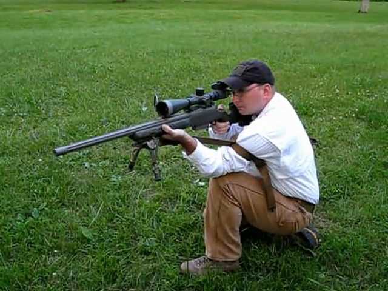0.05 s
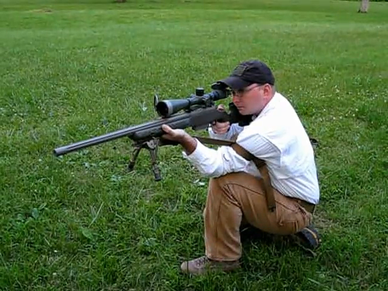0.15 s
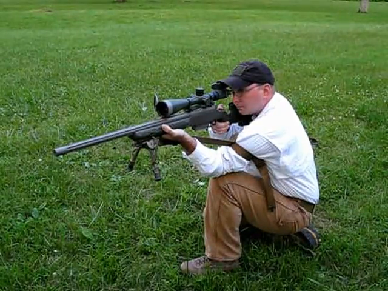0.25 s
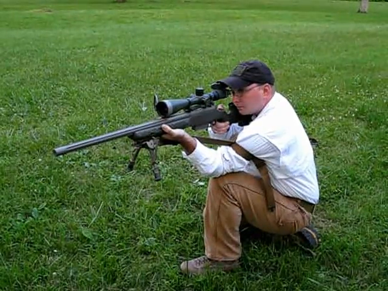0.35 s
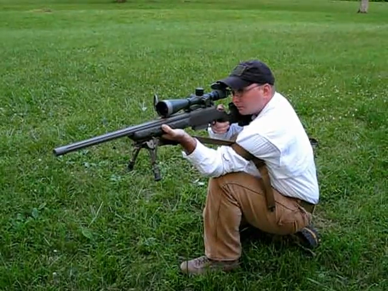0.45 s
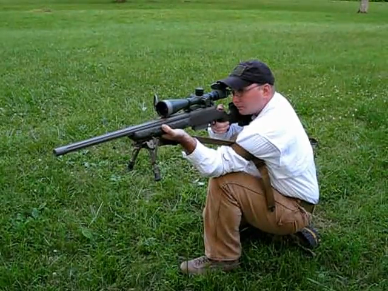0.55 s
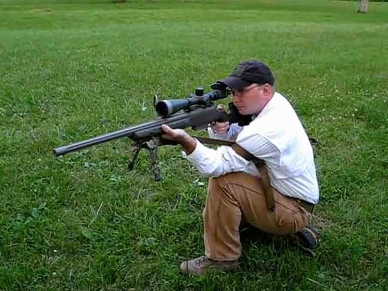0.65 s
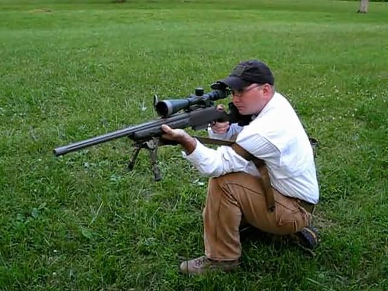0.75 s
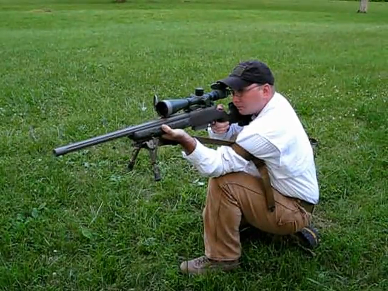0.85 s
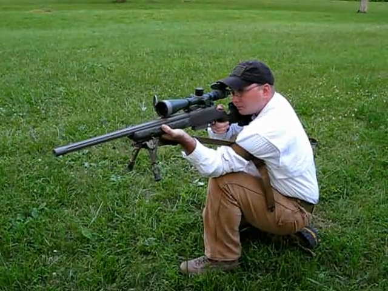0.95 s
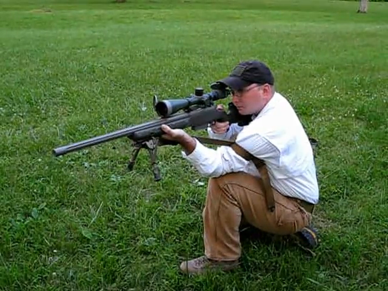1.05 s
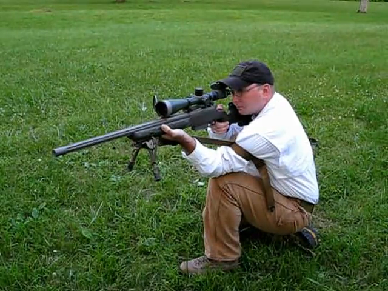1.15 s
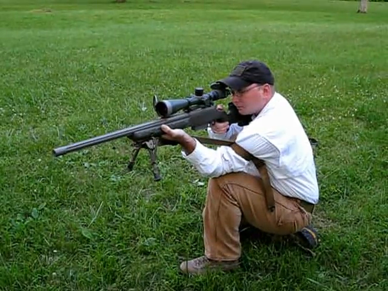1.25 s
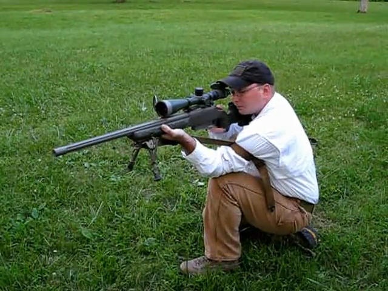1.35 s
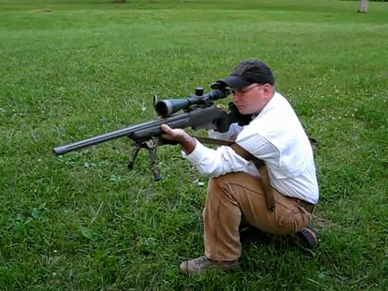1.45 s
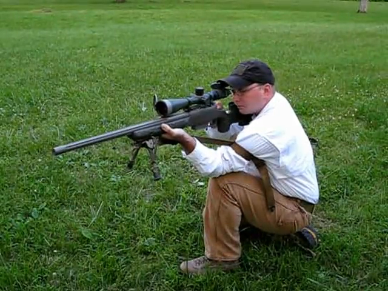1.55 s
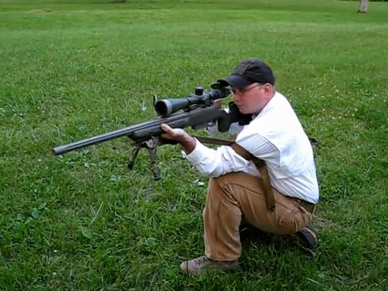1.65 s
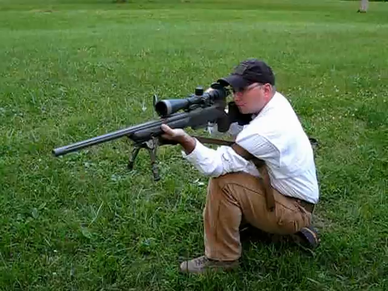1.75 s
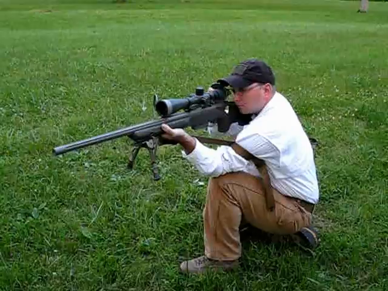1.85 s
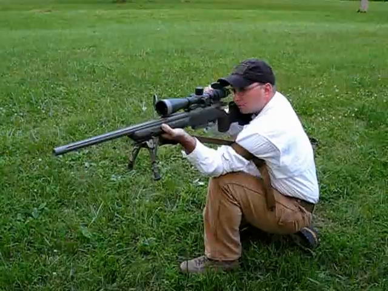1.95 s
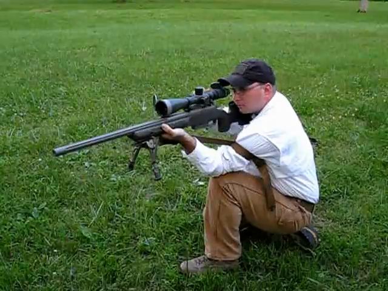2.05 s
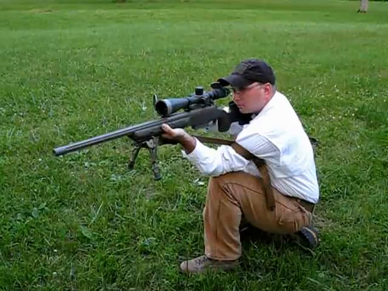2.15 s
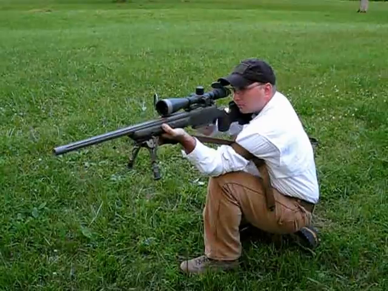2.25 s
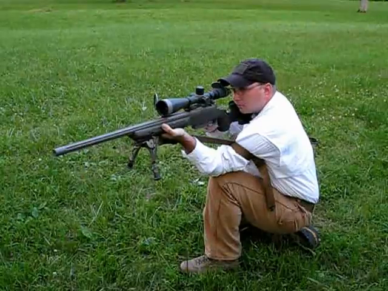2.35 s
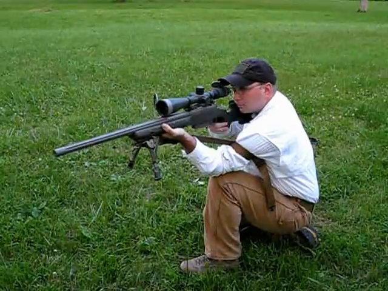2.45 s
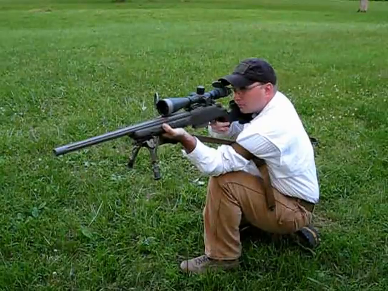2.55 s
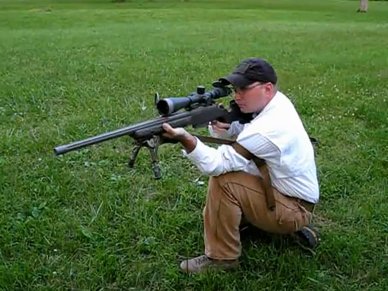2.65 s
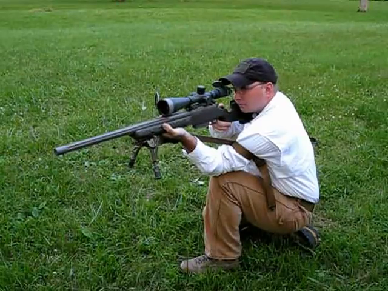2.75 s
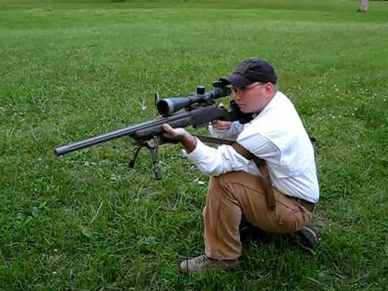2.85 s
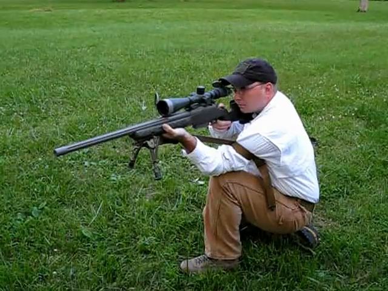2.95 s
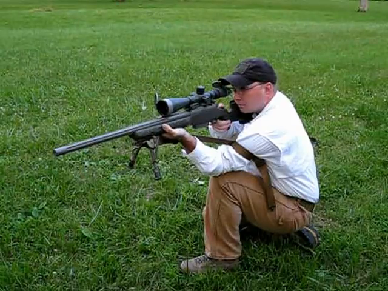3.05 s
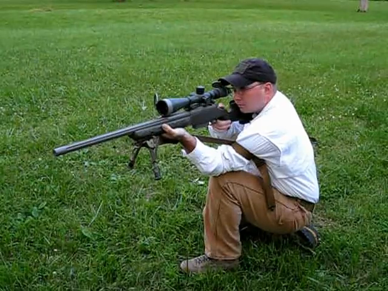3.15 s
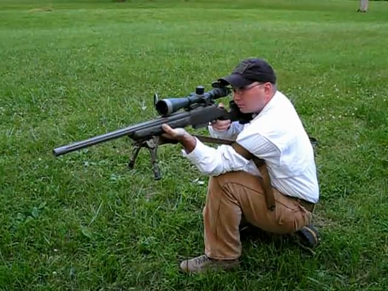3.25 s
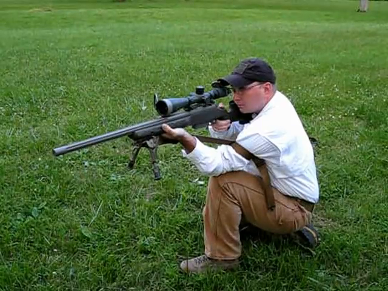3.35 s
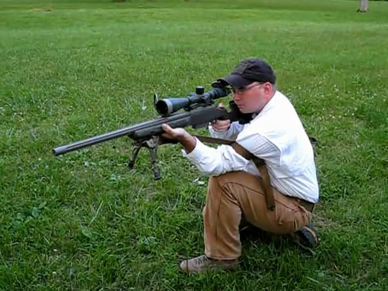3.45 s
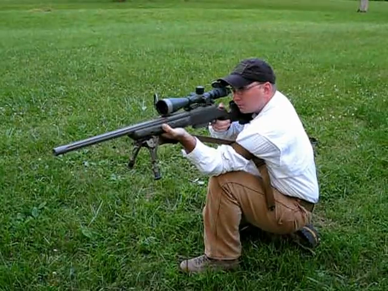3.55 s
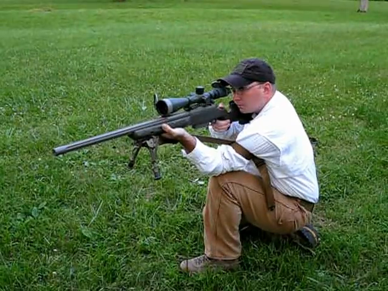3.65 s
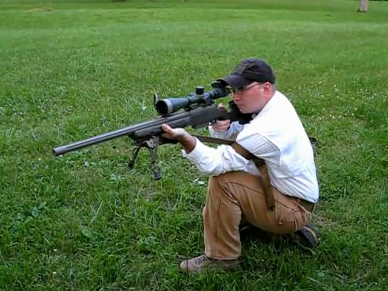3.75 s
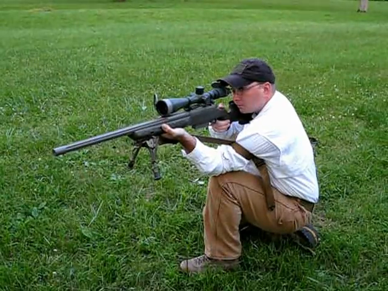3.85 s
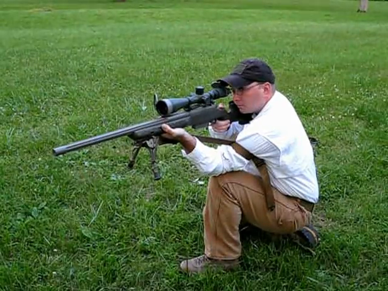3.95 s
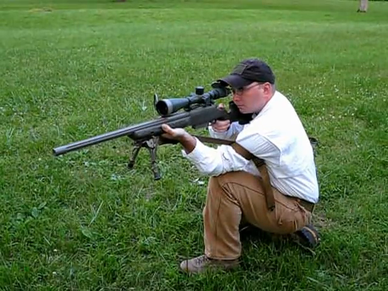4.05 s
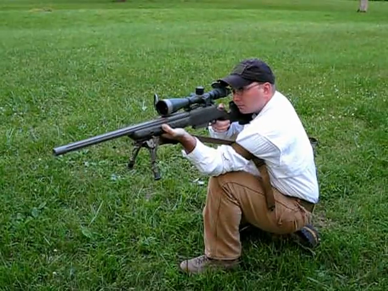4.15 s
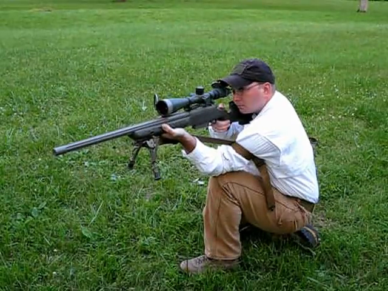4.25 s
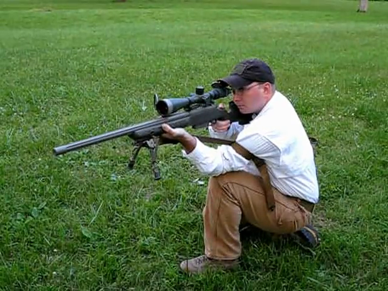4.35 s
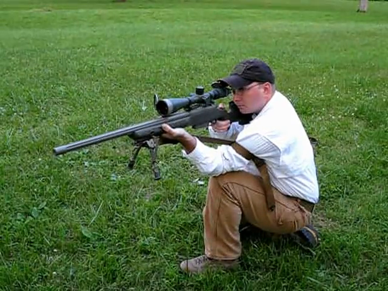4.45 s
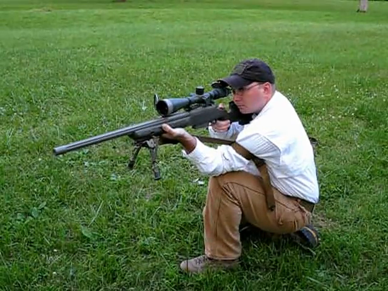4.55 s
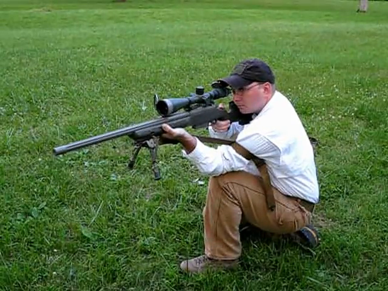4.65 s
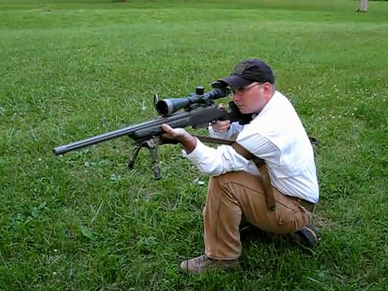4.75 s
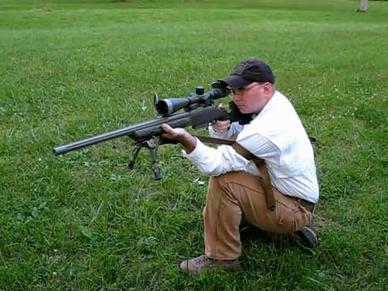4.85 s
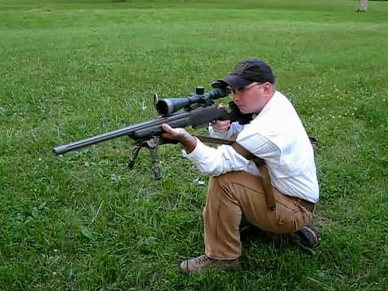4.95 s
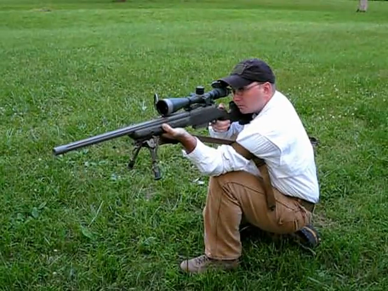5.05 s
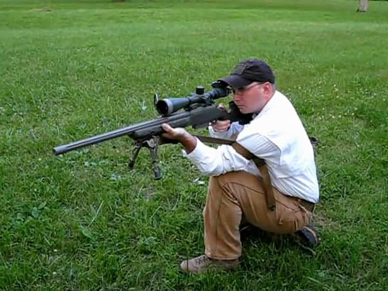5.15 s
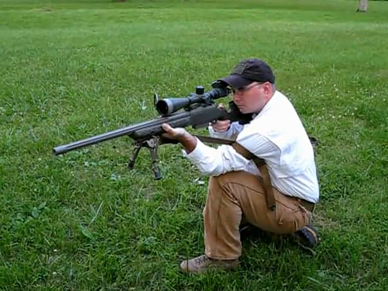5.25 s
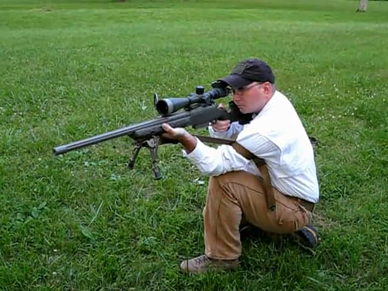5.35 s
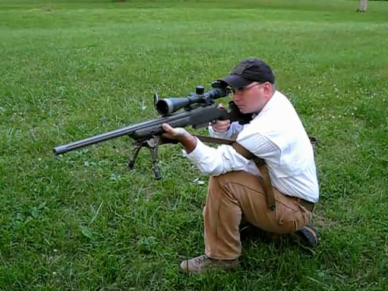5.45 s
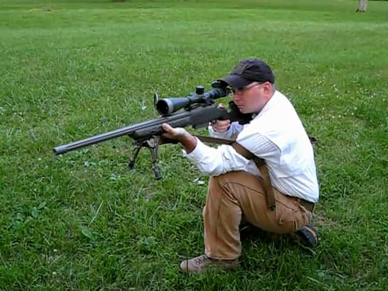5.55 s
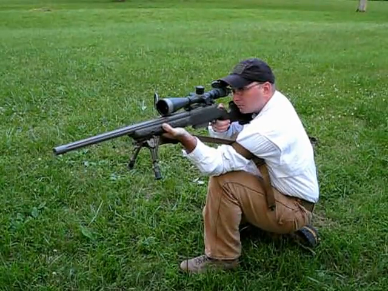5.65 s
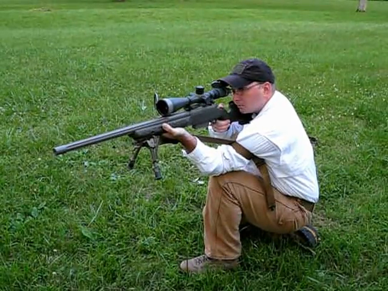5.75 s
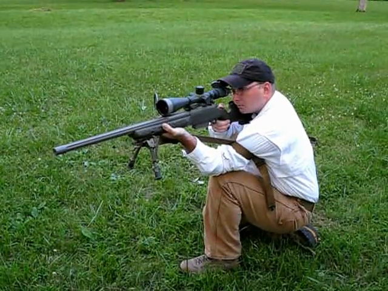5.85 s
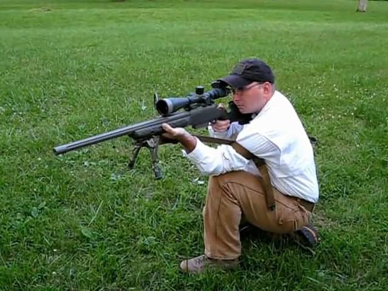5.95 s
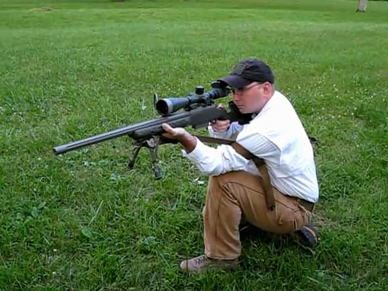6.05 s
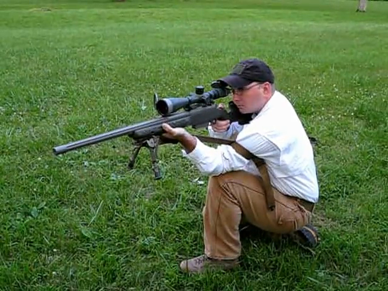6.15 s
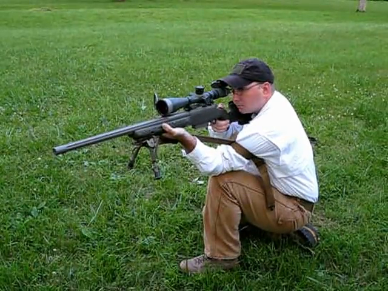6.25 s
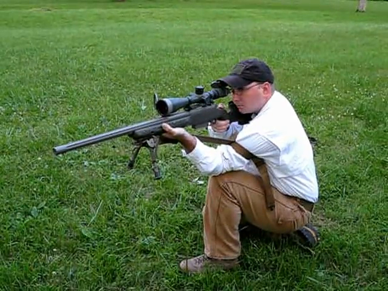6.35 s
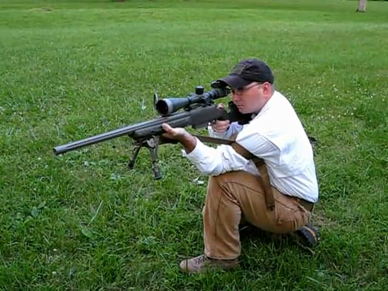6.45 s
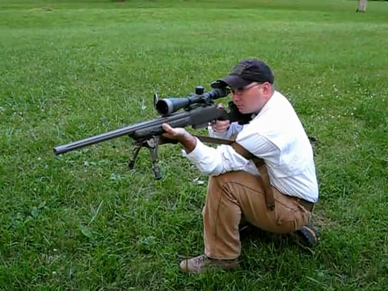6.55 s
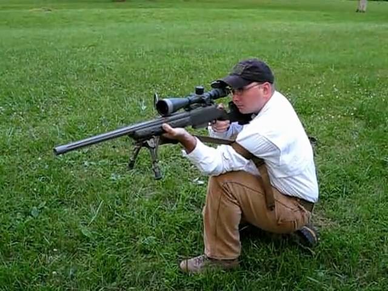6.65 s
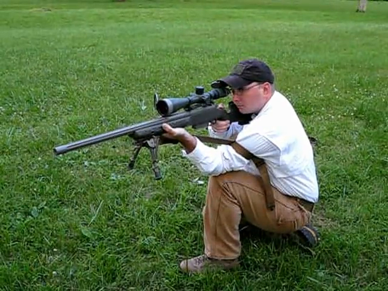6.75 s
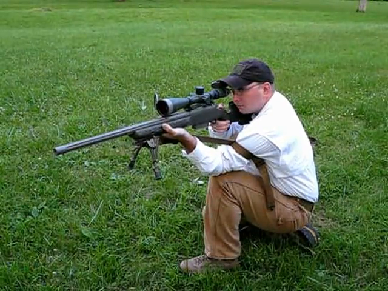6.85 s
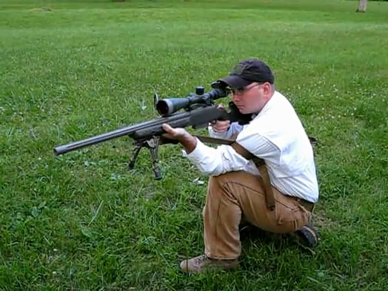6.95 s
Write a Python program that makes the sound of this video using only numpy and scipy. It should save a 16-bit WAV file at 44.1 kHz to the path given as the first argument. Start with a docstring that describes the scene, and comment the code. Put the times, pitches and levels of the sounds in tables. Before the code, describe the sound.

A soft, steady wash of distant traffic fills an open lawn for the whole seven seconds or so, with short, slurred bird chirps and a few thin, buzzy calls far off in the trees. At about 1.0 seconds, close to the microphone, an unloaded rifle is dry-fired: one sharp steel snap, the loudest sound. The bolt handle lifts with a click at 1.6 seconds, and the bolt slides back to its stop at 1.9. It is pushed home at 2.1 and locks with a firm click at 2.3. Each click rings briefly and leaves a light, scattered echo from the trees. After that only the background remains. The birds keep chirping, and a faint, low engine drone within the traffic slowly gathers speed, is nearest around 3.9 seconds and eases off at about 5.5.

```python
"""A wash of distant traffic comes first, with birds singing far off and one engine slowly gathering speed.
On a lawn, close to the microphone, an unloaded rifle is dry-fired; then its bolt is lifted, drawn back,
pushed home and locked, each click steel ringing against steel. The trees around scatter the clicks back,
and the camera's limiter ducks briefly after the loudest ones."""
import sys
import numpy as np
from scipy import signal
from scipy.fft import rfft, irfft, next_fast_len
from scipy.io import wavfile
from scipy.ndimage import uniform_filter1d, minimum_filter1d

SR = 44100
rng = np.random.default_rng(int(sys.argv[2]) if len(sys.argv) > 2 else 0)


def put_to_file(sound):
    """Save the sound as 16-bit audio at rate SR, in the file named by the first command-line argument."""
    columns = np.atleast_2d(sound).T  # one column per channel
    safe = np.clip(columns, -1, 1)
    whole_steps = np.round(safe * 32767)
    wavfile.write(sys.argv[1], SR, whole_steps.astype(np.int16))


N = 308259
TIME = np.arange(N) / SR


def amp(db):
    """Decibels to gain."""
    return 10 ** (np.asarray(db) / 20)


def unit_rms(x):
    """Scales to rms 1."""
    return x / np.sqrt(np.mean(x ** 2) + 1e-20)


def curve_db(points, hz):
    """Reads a spectrum on a log-frequency axis."""
    point_hz, db = np.transpose(points)
    return np.interp(np.log(hz + 1), np.log(point_hz + 1), db)


def add(mix, start_s, sound):
    """Mixes a sound in at its start time."""
    part = mix[max(round(start_s * SR), 0):][:len(sound)]
    part += sound[:len(part)]


def wander(rate_hz):
    """Slow random motion of rms 1."""
    size = next_fast_len(N, True)
    hz = np.fft.rfftfreq(size, 1 / SR)
    return unit_rms(irfft(rfft(rng.standard_normal(size)) * np.exp(-(hz / rate_hz) ** 2), size)[:N])


def resonance(hz, centre_hz, width_hz):
    """The shape of one resonance, 1 at its centre."""
    return 1 / (1 + (2 * (hz - centre_hz) / width_hz) ** 2)


def ringing(db):
    """The causal impulse response that has this gain curve."""
    log_gain = np.log(amp(np.r_[db, db[-2:0:-1]]))
    return np.fft.ifft(np.exp(np.conj(signal.hilbert(log_gain)))).real


def scatter(envelope_db, colour, air_loss_db=0):
    """A dense echo of energy 1; air_loss_db is the loss per second of travel at 10 kHz."""
    hz, t, bins = signal.stft(rng.standard_normal(len(envelope_db)), SR, nperseg=256)
    bins *= amp(curve_db(colour, hz)[:, None] - air_loss_db * t * (hz[:, None] / 10000) ** 2)
    tail = signal.istft(bins, SR, nperseg=256)[1][:len(envelope_db)] * amp(envelope_db)
    return tail / np.linalg.norm(tail)


# Far roads and rustling air, heard from the lawn. Each row: frequency in Hz, relative level in dB.
TRAFFIC_SPECTRUM = [(20, -30), (36, -47), (55, -22.5), (100, -8.5), (200, -6), (450, -8), (620, -6.5),
                    (900, -0.5), (1250, -3), (2000, -9.5), (4000, -16.5), (8000, -22.5), (12000, -26.5),
                    (16000, -33.5)]


def traffic(level_db=-44, nearest_s=1.58, fade_db_per_s=0.3168, patchy_db=0.5):
    """Tyre roar with drifting patches under a smooth hiss, loudest at its nearest moment."""
    hz, _, bins = signal.stft(rng.standard_normal(N), SR, nperseg=2048, noverlap=1536)
    patches = uniform_filter1d(rng.standard_normal(bins.shape), size=16, axis=0)
    patches = unit_rms(uniform_filter1d(patches, size=12, axis=1))
    bins *= amp(curve_db(TRAFFIC_SPECTRUM, hz)[:, None] + patchy_db * patches / (1 + hz[:, None] / 3000))
    wash = signal.istft(bins, SR, nperseg=2048, noverlap=1536)[1][:N]
    return amp(level_db - fade_db_per_s * abs(TIME - nearest_s)) * unit_rms(wash)


# One engine out in the traffic. Each row: multiple of the cycle rate, relative level in dB under load,
# the same with the throttle eased.
FIRING_ORDERS = [(3, -18, -5), (4, -5.5, -2), (5, -12, -5), (6, 0, -0.5), (7, -5, -13)]


def engine(level_db=-57, nearest_s=3.9, fade_db_per_s=2.5, ease_s=5.535, flutter_db=1.5,
           start_hz=14.65, climb_hz_per_s=0.82, top_hz=18.85, drop_hz=0.9):
    """Only low firing orders carry this far; as the throttle eases, they sag and order three booms."""
    eased = np.clip((TIME - ease_s) / 0.2, 0, 1)
    cycle_hz = np.minimum(start_hz + climb_hz_per_s * TIME, top_hz) - drop_hz * eased
    cycles = np.cumsum(cycle_hz) / SR
    drone = np.zeros(N)
    for order, loaded_db, eased_db in FIRING_ORDERS:
        order_db = loaded_db + (eased_db - loaded_db) * eased + flutter_db * wander(4.3)
        drone += amp(order_db) * np.sin(2 * np.pi * (round(order) * cycles + rng.random()))
    return np.sqrt(2) * amp(level_db - fade_db_per_s * abs(TIME - nearest_s)) * drone


def whistle(hz):
    """A soft-edged tone of rms 1 on this pitch curve."""
    return unit_rms(np.sin(2 * np.pi * np.cumsum(hz) / SR) * signal.windows.tukey(len(hz), 0.5))


# A songbird far off in the trees. Each row: start in seconds, note length in seconds, first and last
# pitch of the slur in Hz, level in dB before the trees, number of notes.
SONG_PHRASES = [ (0.353, .014, 5700, 7860, -51.5, 1), (0.749, 0.087, 3700, 2890, -48, 3),
                (1.368, 0.045, 3050, 2850, -45.5, 1), (1.42, .064, 2830, 2530, -46, 1),
                (1.906, .065, 3352, 2890, -42.5, 1), (1.992, 0.052, 2730, 2410, -47, 1),
                (2.578, .03, 2940, 3070, -50, 1), (2.632, .046, 3090, 2817, -46, 2),
                (2.72, .05, 3140, 3450, -55, 1), (3.152, .033, 3680, 2560, -47.5, 1),
                (3.535, 0.025, 2730, 2970, -48, 1), (3.539, 0.069, 2555, 2300, -47, 1),
                (3.591, 0.13, 2264, 2290, -55.5, 1), (3.661, 0.14, 3090, 3160, -53, 1),
                (3.71, 0.15, 2740, 2615, -54, 1), (4.151, .032, 2780, 3050, -51.5, 1),
                (4.197, 0.055, 3120, 2756, -47.5, 2), (4.709, .038, 3450, 2600, -47.5, 1),
                (5.076, 0.08, 2680, 2600, -54, 1), (5.166, .047, 3240, 2845, -45.5, 2),
                (5.733, 0.05, 2366, 2570, -46.5, 1), (5.836, 0.06149, 2253, 2520, -48.5, 1),
                (6.222, 0.099, 3310, 2477, -46.5, 1), (6.309, 0.061, 3100, 2810, -49.5, 1),
                (6.375, 0.057, 2600, 2270, -48, 1), (6.42, 0.1, 2220, 2177, -47, 1),
                (6.895, 0.029, 3400, 3530, -54.5, 1), (6.934, 0.062, 2580, 2480, -47.5, 1)]


def songbird(quaver_hz=35, step_ratio=0.82, step_db=-2, spacing=1.04):
    """Slurred whistles; each further note of a phrase is lower and softer."""
    song, quaver = np.zeros(N), quaver_hz * wander(205)
    for phrase_s, length_s, first_hz, last_hz, db, notes in SONG_PHRASES:
        remaining = np.linspace(1, 0, round(length_s * SR))
        slur_hz = last_hz + (first_hz - last_hz) * remaining ** 1.8  # starts fast, then settles
        unsteady = min(abs(first_hz - last_hz) / 200, 1.5)  # steep slurs are the least steady
        for note in range(round(notes)):
            start_s = phrase_s + note * spacing * length_s
            wobble_hz = unsteady * np.resize(quaver[round(start_s * SR):], len(slur_hz))
            pitch_hz = slur_hz * step_ratio ** note + wobble_hz
            add(song, start_s, amp(db + note * step_db) * whistle(pitch_hz))
    return song


# A second distant bird. Each row: start in seconds, level in dB before the trees.
BUZZ_CALLS = [(.14, -61), (.39, -63), (.61, -65), (.89, -65), (3.03, -60.5), (3.98, -68), (5.94, -68)]


def buzzing_bird(pitch_hz=7420, length_s=0.16, trill_hz=95, depth_hz=230, waver_hz=120):
    """A thin whistle, trilled so fast that it buzzes."""
    calls = np.zeros(N)
    hz = pitch_hz + depth_hz * np.sin(2 * np.pi * trill_hz * TIME) + waver_hz * wander(150)
    for start_s, db in BUZZ_CALLS:
        add(calls, start_s, amp(db) * whistle(hz[round(start_s * SR):][:round(length_s * SR)]))
    return calls


def through_woods(calls, direct_db=-2, scattered_db=-3, t60_s=0.7):
    """The trees smear the birdsong on its way to the microphone."""
    woods = scatter(-60 * np.arange(SR) / SR / t60_s, colour=[(1000, 0), (8000, 0)])
    return amp(direct_db) * calls + amp(scattered_db) * signal.oaconvolve(calls, woods)[:N]


# The colour of the echo from the trees around the lawn. Each row: frequency in Hz, relative gain in dB.
ECHO_COLOUR = [(100, -4), (1000, 2), (2800, -4), (3450, -1), (3950, 3), (4500, -2), (5250, 0.5), (5650, 4),
               (6500, 3), (9000, 5.5), (11000, 8), (15500, 4)]


def tree_echo(rings, echo_db=-22.5, sides=6, rise_s=0.023, hold_s=0.074, near_t60_s=0.38, far_t60_s=1.0):
    """Trunks and leaves return the clicks: near trees answer together, far ones leave a faint tail."""
    t = np.arange(SR) / SR
    onset = 1 - np.exp(-(t / rise_s) ** 2)
    near = amp(-60 * np.maximum(t - hold_s, 0) / near_t60_s)
    far = amp(-1.5 - 60 * t / far_t60_s)
    envelope_db = 20 * np.log10(onset * np.maximum(near, far) + 1e-9)
    echoes = (signal.fftconvolve(rifle(rings), scatter(envelope_db, ECHO_COLOUR, air_loss_db=36))[:N]
              for _ in range(sides))
    return amp(echo_db) / np.sqrt(sides) * sum(echoes)


# Resonances of the action and barrel, close up. Each row: centre in Hz, width in Hz, lift in dB.
STEEL_MODES = [(890, 180, 3.5), (1100, 220, 4), (1773, 170, 8), (2083, 78, 7.5), (2500, 290, 7),
               (2843, 250, 8.5), (3430, 420, 7.5), (4350, 150, 5), (4820, 190, 7.5), (5280, 200, 9),
               (5830, 180, 9), (7020, 410, 8), (8200, 140, 6.5), (9900, 350, -2), (10900, 900, 1.5),
               (12940, 340, 4), (13300, 360, -8)]
# The broad colour of a blow on steel. Each row: frequency in Hz, relative level in dB.
BLOW_COLOUR = [(30, -31), (100, -22), (450, -13.5), (900, -5), (1450, -3.5), (2500, -1.5), (3900, -1),
               (5600, -6), (9000, -8), (13000, -8.5), (16000, -8)]


def struck_part(blow_db, thud_db, knock_db, bright_db, part_hz, part_q=6, size=4096):
    """One impact's ring: steel resonances and the part's note, with its own thud, knock and brightness."""
    hz = np.fft.rfftfreq(size, 1 / SR)
    modes_db = sum(db * resonance(hz, centre, width) for centre, width, db in STEEL_MODES)
    contact_db = curve_db([(480, thud_db), (820, knock_db), (1500, 0), (4200, 0), (11000, bright_db)], hz)
    lift_db = 7.5 + 0.55 * max(blow_db, 0)  # hard blows bring out the part's own note
    part_db = lift_db * resonance(hz, part_hz, part_hz / part_q)
    return ringing(curve_db(BLOW_COLOUR, hz) + modes_db + contact_db + part_db)[:size // 4]


def chatter(decay_s, rise_s=0.0013, shake_db=-25, shake_t60_s=0.063, shake_hz=5000, size=4096):
    """The parts buzz against each other for a few ms, then the loose ones shake on, duller and fainter."""
    t = np.arange(size) / SR
    onset = 1 - np.exp(-(t / rise_s) ** 2)
    envelope = onset * amp(-60 * t / decay_s)
    contact, shake = rng.standard_normal((2, size))
    spectrum = rfft(envelope * contact)
    spectrum /= np.sqrt(abs(spectrum) + 1e-9)  # flatter: a hard contact excites all pitches alike
    buzz = irfft(spectrum) * amp(-20 * t / decay_s)
    buzz *= np.linalg.norm(envelope) / np.linalg.norm(buzz)
    shake = unit_rms(signal.lfilter([1], [1, -np.exp(-2 * np.pi * shake_hz / SR)], shake))
    return buzz + shake * onset * amp(shake_db - 60 * t / shake_t60_s)


def strike(db, ring, decay_s=0.015, halving_db=17.5):
    """One contact: its chatter, shorter the harder the blow, sets the ring going."""
    click = signal.fftconvolve(chatter(decay_s * 2 ** (-db / halving_db)), ring)
    peak_rms = np.sqrt(uniform_filter1d(click ** 2, size=88).max())  # the loudest 2 ms
    return amp(db) * click / peak_rms


# Steel on steel near the microphone: the firing pin falls at 1.05 s, the handle lifts at 1.64 s, the bolt
# meets the rear stop at 1.85 s, closes at 2.1 s and locks from 2.21 s. Each row: start in seconds,
# relative level in dB, thud, knock and brightness in dB, ring of the struck part in Hz.
STEEL_IMPACTS = [ (1.0457, -16, -7, -5, -5, 5300), (1.0488, 9, 8, 1, 9, 5050),
                 (1.0505, 10, 7.5, -2, 8.5, 4040), (1.064, -13, -7, 6, -7, 1750),
                 (1.6393, -6.5, -7, -5, -18, 2270), (1.6449, -4.5, 0, 3, -1, 5150),
                 (1.6505, 0.5, 6.5, 11.5, 11, 1760), (1.7129, -11, 4.5, 6.5, 5, 4650),
                 (1.7423, -23, 0, 12, -11, 2914), (1.8546, -3.5, 4, 8, 8.5, 1230),
                 (1.8823, -21.5, 14, 11, 4, 1180), (2.0973, -23.5, 9, 9, 1, 2740),
                 (2.1268, 3, 8.5, -1, 4, 7300), (2.131, -2, -5, -6, 1, 4130),
                 (2.2126, -12.5, -9, -4, -12, 5100), (2.22, -14.5, 5, 3, -28, 2050),
                 (2.2509, -15, -4, -5, -9, 2600), (2.3022, 2, 2, 5.5, -3.5, 5120), ]
# The bolt travelling along its track. Each row: start in seconds, end in seconds.
BOLT_SLIDES = [(1.72, 1.775), (1.86, 2.01), (2.08, 2.125)]


def rifle(rings, gain_db=-5, rebound_s=(0.004, 0.011), rebound_db=-20, ticks_per_s=100, tick_db=-35):
    """Each impact rings and rebounds once, lightly; the bolt ticks along its track in between."""
    clicks = np.zeros(N)
    light_ring = struck_part(blow_db=0, thud_db=15.5, knock_db=12, bright_db=-1, part_hz=2648.5)
    for (start_s, db, *_), ring in zip(STEEL_IMPACTS, rings):
        add(clicks, start_s, strike(db, ring))
        add(clicks, start_s + rng.uniform(*rebound_s), strike(db + rebound_db, light_ring))
    for start_s, end_s in BOLT_SLIDES:
        for tick_s in np.arange(start_s, end_s, 1 / ticks_per_s):
            add(clicks, tick_s + rng.random() / ticks_per_s, strike(rng.normal(tick_db, 2), light_ring))
    return amp(gain_db) * clicks


def scene():
    """One microphone on the lawn: the far surroundings, the rifle close by, and its echo."""
    background = traffic() + engine() + through_woods(songbird() + buzzing_bird())
    rings = [struck_part(*blow) for _, *blow in STEEL_IMPACTS]
    return (background + rifle(rings) + tree_echo(rings))[None]


def record(dry, threshold_db=-2, attack_s=0.002, hold_s=0.014, recovery_db_per_s=180, ceiling=0.83,
           low_cut_hz=48, high_cut_hz=15750):
    """The camera's limiter clamps, holds and recovers; what slips past saturates, then is band-limited."""
    over_db = np.maximum(20 * np.log10(abs(dry[0]) + 1e-9) - threshold_db, 0)
    span = round(hold_s * SR) // 2 * 2 + 1
    held_db = -minimum_filter1d(-over_db, span, origin=span // 2)
    recovery_db = TIME * recovery_db_per_s
    duck_db = np.maximum.accumulate(held_db + recovery_db) - recovery_db
    lag = np.exp(-1 / (attack_s * SR))
    limited = dry[0] / amp(signal.lfilter([1 - lag], [1, -lag], duck_db))
    saturated = limited / np.sqrt(np.hypot(1, (limited / ceiling) ** 2))
    low_cut = signal.butter(3, low_cut_hz, "highpass", fs=SR, output="sos")
    high_cut = signal.firwin(601, high_cut_hz, window=("kaiser", 9), fs=SR)
    return signal.oaconvolve(signal.sosfilt(low_cut, saturated), high_cut, "same")[None]


dry = scene()
out = record(dry)
put_to_file(out)
```